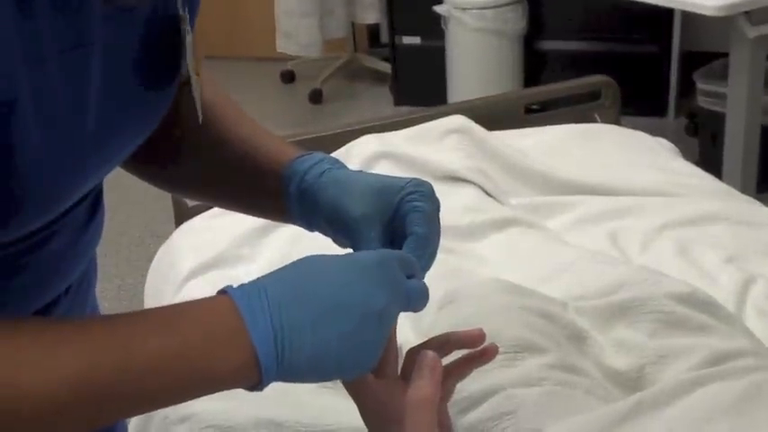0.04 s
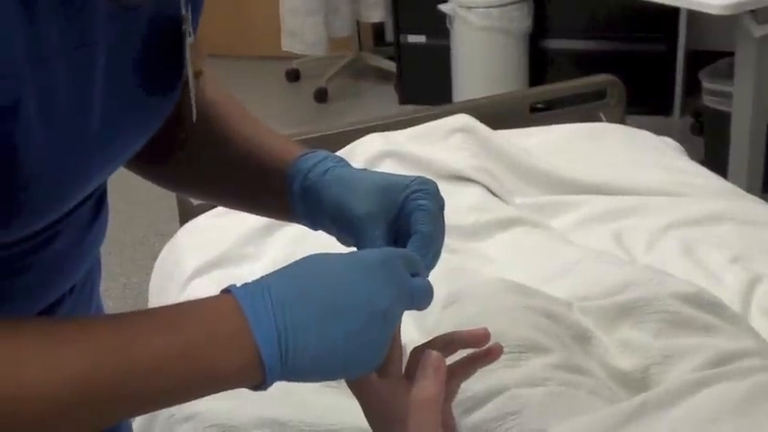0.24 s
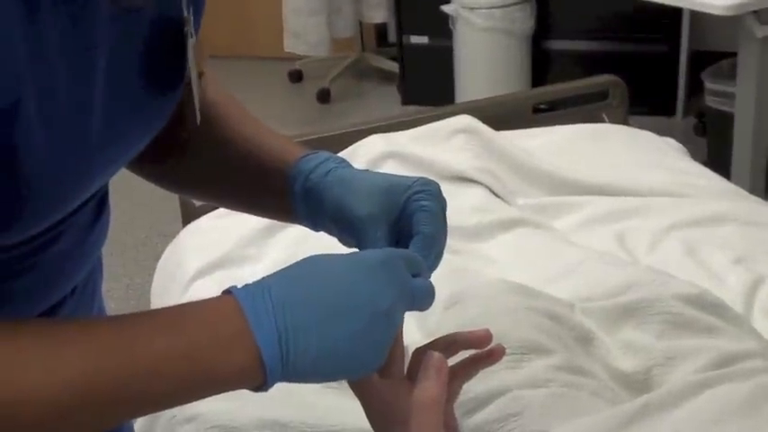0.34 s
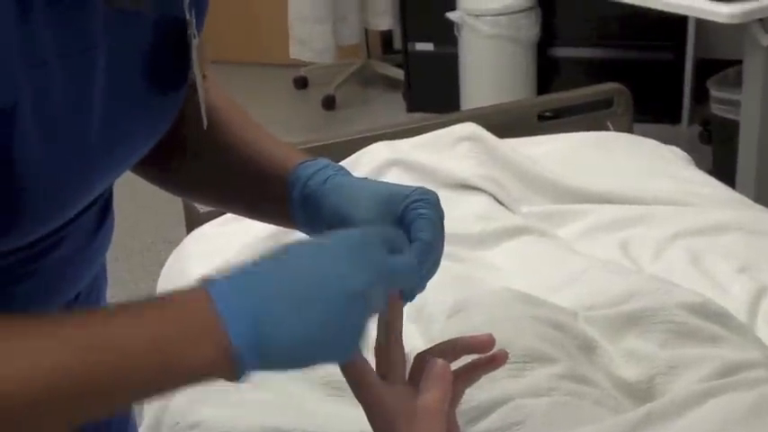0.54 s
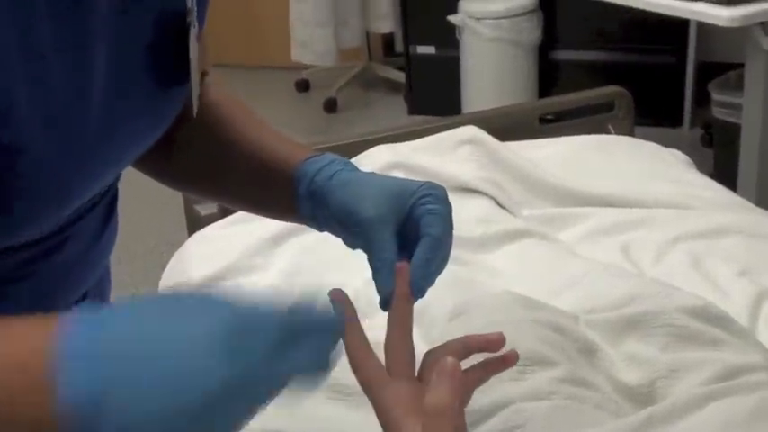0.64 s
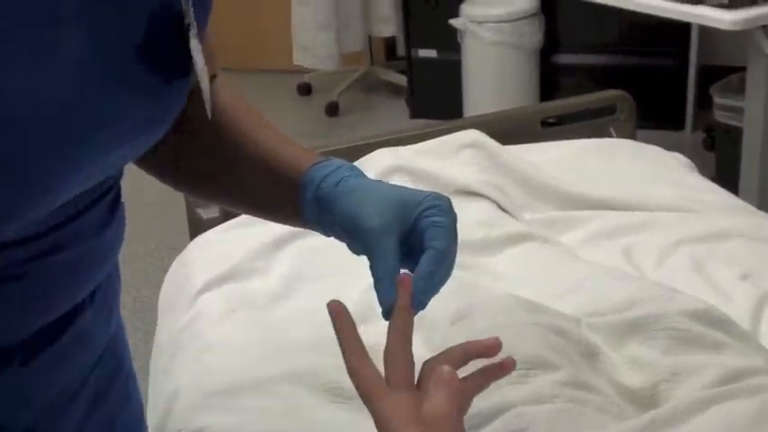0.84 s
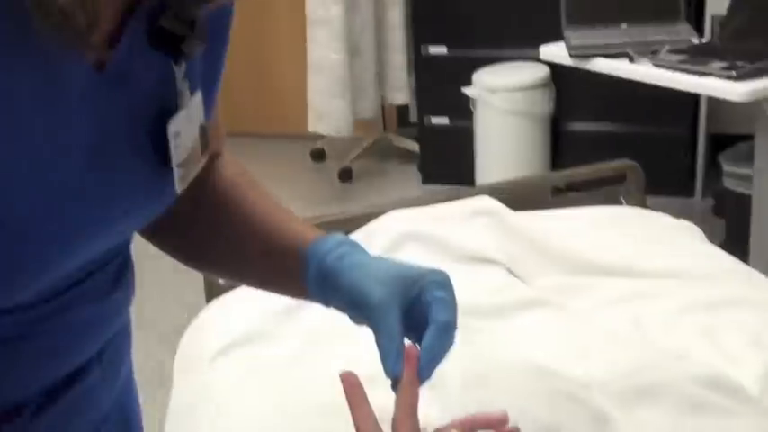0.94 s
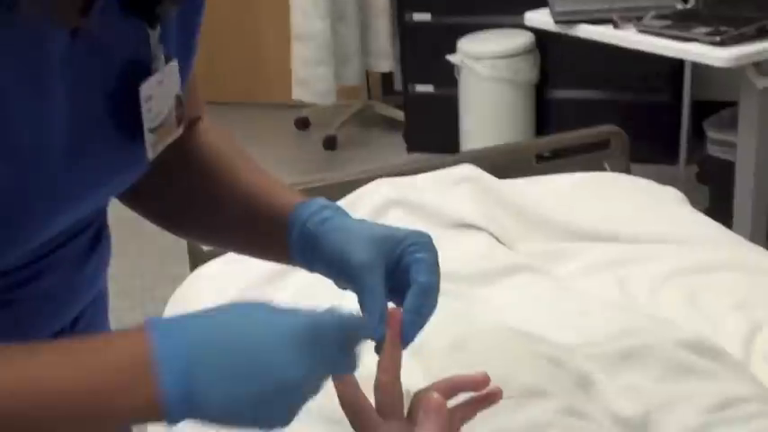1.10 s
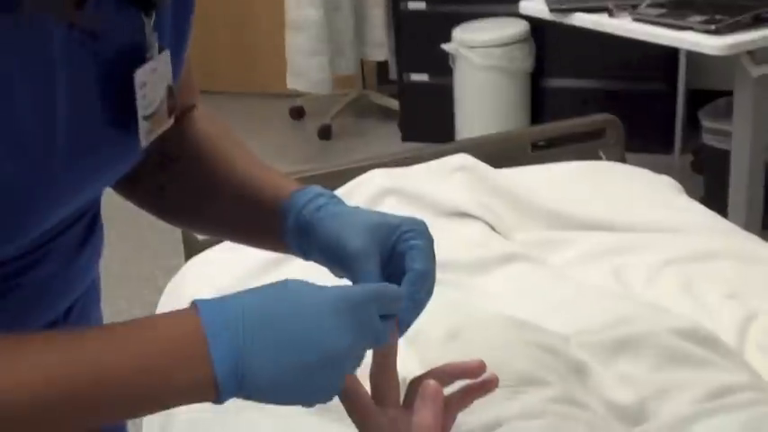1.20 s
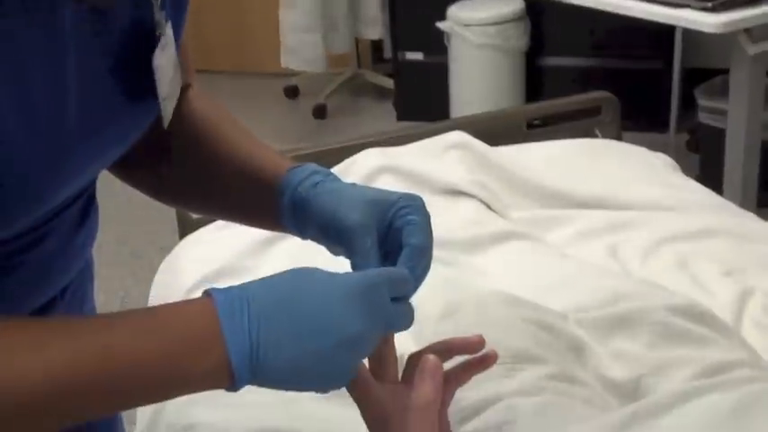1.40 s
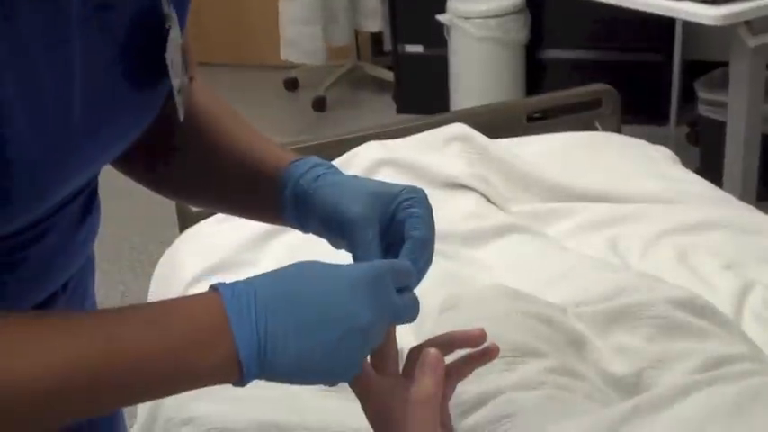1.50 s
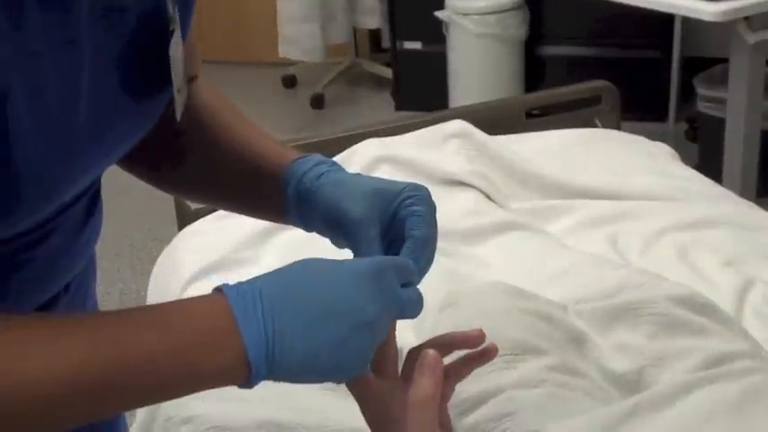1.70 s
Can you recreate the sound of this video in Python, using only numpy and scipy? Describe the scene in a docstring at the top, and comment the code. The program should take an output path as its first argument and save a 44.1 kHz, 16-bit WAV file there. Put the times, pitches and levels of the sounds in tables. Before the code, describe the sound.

Close by, a plastic finger pricker clicks and snaps with a tiny, quickly stopped spring ring. Afterwards there is only a faint rustle of gloves and the low, steady hum and hiss of air in a hospital room.

```python
"""Ventilation rumbles, hisses and hums in a quiet clinic room. Then, close by, a spring-loaded plastic
lancet (a finger pricker) is fired against a fingertip. Its trigger ticks as it is pressed and its catch
clicks free: plastic scrapes and the housing rings. The needle carrier rattles home and its ringing
spring is stopped dead. Afterwards, gloved hands rustle softly."""
import sys
import numpy as np
from scipy import signal
from scipy.fft import rfft, irfft
from scipy.io import wavfile
from scipy.ndimage import uniform_filter1d

SR = 44100
rng = np.random.default_rng(int(sys.argv[2]) if len(sys.argv) > 2 else 0)


def pcm_store(signal):
    """Save signal as 16-bit PCM."""
    levels = np.round(np.clip(np.atleast_2d(signal), -1, 1) * 32767)
    wavfile.write(sys.argv[1], SR, levels.astype(np.int16).T)


N = 77175


def gain(db):
    """Turn decibels into a multiplier."""
    return 10 ** (np.asarray(db) / 20)


def across(points, size=N):
    """Read (frequency, value) points at every frequency of a spectrum."""
    hz, value = np.array(points, float).T
    return np.interp(np.log(np.fft.rfftfreq(size, 1 / SR) + 1), np.log(hz + 1), value)


def noise(colour):
    """Noise of a given colour (its mix of low and high), with a strength near 1."""
    shape = gain(across(colour))
    shape /= np.sqrt(np.mean(shape ** 2))
    return irfft(rfft(rng.standard_normal(N)) * shape, N)


def knock(colour, size=2048):
    """One sharp tap of a given colour, with energy 1."""
    cepstrum = irfft(np.log(gain(across(colour, size))))
    cepstrum[1:size // 2] *= 2  # folding it in half packs the energy at the tap's start
    cepstrum[size // 2 + 1:] = 0
    tap = irfft(np.exp(rfft(cepstrum)))
    return tap / np.linalg.norm(tap)


def fade(age, t60):
    """Silent before age 0, then dying away by 60 dB every t60 seconds (the fade time)."""
    return (age >= 0) * np.exp(-np.log(1000) * np.maximum(age, 0) / t60)


def swell(age, rise, hold, t60):
    """Rise, hold, then die away."""
    return np.clip(age / rise, 0, 1) ** 2 * fade(np.maximum(age - rise - hold, 0), t60)


def bump(t, centre, width):
    """A smooth rise and fall."""
    return np.exp(-((t - centre) / width) ** 2)


def lows(x, hz):
    """The part of a sound below a frequency."""
    return irfft(rfft(x) / (1 + (np.fft.rfftfreq(N, 1 / SR) / hz) ** 6), N)


def drift(per_second):
    """A slow random wander, roughly between -1 and 1."""
    step = int(SR / per_second)
    return 1.25 * uniform_filter1d(np.repeat(rng.standard_normal(N // step + 1), step), step)[:N]


# colour of the moving air (frequency [Hz], relative level [dB])
AIR_COLOUR = [(15, -23), (25, -1), (49, 0.5), (75, -11.5), (113, -4), (209, -10), (240, -12.5), (267, -10),
              (433, -17), (482, -15), (552, -16.5), (722, -17), (1020, -19), (2490, -24), (5880, -29.5),
              (13900, -40), (15500, -43)]
# how alike the air sounds in both ears (frequency [Hz], likeness [0-1])
AIR_LIKENESS = [(60, 0.86), (130, 1), (290, 0.6), (640, 0.21), (1410, 0.27), (3100, 0.24), (6820, 0.25),
                (15000, 0.12)]


def air():
    """Moving air makes noise: the rumble is much the same in both ears, the hiss mostly is not."""
    shared, left, right = (rfft(noise(AIR_COLOUR)) for _ in range(3))
    likeness = np.clip(across(AIR_LIKENESS), 0, .999)
    spectrum = np.sqrt(likeness) * shared + np.sqrt(1 - likeness) * np.array([left, right])
    return gain(-48) * irfft(spectrum, N)


# tones of the fan and mains power (pitch [Hz], level [dB])
HUM_TONES = [(42, -56.5), (120, -63), (184, -66), (239, -62.5), (305, -63), (730, -71)]
# brief swells of the low drone (peak time [s], half-width [s], pitch [Hz], level [dB])
HUM_SWELLS = [(.63, 0.077, 237.6, -52.5), (0.887, 0.067, 118.7, -53.5), (1.342, 0.045, 122, -44.5),
              (1.63, 0.17, 184.8, -55)]


def hum(t):
    """The fan and mains power hum in low tones that waver and now and then swell."""
    tones = sum(gain(db + 3.5 * drift(5.64)) * np.sin(2 * np.pi * hz * t + drift(4.9))
                for hz, db in HUM_TONES)
    swells = sum(gain(db) * bump(t, centre, width) * np.sin(2 * np.pi * hz * t + drift(12))
                 for centre, width, hz, db in HUM_SWELLS)
    return tones + swells


# which side the ventilation leans to (frequency [Hz], left minus right [dB])
VENT_BALANCE = [(60, -22), (110, -16.5), (200, -19), (380, -5), (700, -0.5), (1290, 2.5), (2380, 0),
                (4400, -3), (8120, -0.5), (15000, -10.5)]
# slow changes in the hiss (time [s], level change [dB])
HISS_CHANGES = [(0, -1.5), (.45, -1.5), (.75, -0.7), (1.25, -0.5), (1.42, -0.9), (1.75, 0.9)]


def ventilation(t):
    """Air and hum together, with the rumble stronger on the right."""
    sides = gain(np.array([[.5], [-.5]]) * across(VENT_BALANCE))
    sound = irfft(rfft(air() + hum(t)) * sides / sides.mean(axis=0), N)
    rumble = lows(sound, hz=1490)
    hiss_db = np.interp(t, *np.array(HISS_CHANGES).T)
    return rumble + gain(hiss_db) * (sound - rumble)


# tones of the plastic housing (pitch [Hz], level [dB], fade time [s])
HOUSING_TONES = [(550, -17.5, 0.016), (1112, -18, 0.043), (1594, -17.5, 0.025), (2020, -13, 0.036),
                 (2560, -3, 0.013), (3440, -3, .012), (3880, -10, 0.017), (4790, -15.5, 0.021),
                 (5730, -12, 0.016), (7700, -30, .009)]


def housing_ring(age, rise):
    """The housing rings in short tones; every other one starts upside down."""
    return sum((-1) ** k * gain(db) * np.sin(2 * np.pi * hz * (age - rise)) * swell(age, rise, 0, t60)
               for k, (hz, db, t60) in enumerate(HOUSING_TONES))


# colour of plastic scraping on plastic (frequency [Hz], relative level [dB])
SCRAPE_COLOUR = [(150, -2.5), (500, -15.5), (850, -15.5), (1500, -12.5), (2600, -0.5), (4000, -5.5),
                 (5500, -8), (7000, -16.5), (9300, -16.5), (10800, -35), (13000, -24), (16000, -41)]
# clicks of the trigger and catch
# (time [s], level [dB], rise [s], scrape fade time [s], ring [dB], bass [dB], treble [dB], echo [dB])
CLICKS = [(0.1479, -24, .006, 0.017, -6, -1, 0, -10.5), (0.1687, -8.5, 0.00113, 0.021, 0, -9, -10.5, -14),
          (0.2111, -5.5, 0.00125, 0.0095, 1.5, 3, 0, -15.5)]


def trigger_and_catch(t):
    """Each click is a brief scrape that ends in a ring of the housing."""
    sound = 0
    for start, db, rise, t60, ring_db, bass_db, treble_db, echo_db in CLICKS:
        age = t - start
        scrape = gain(-9) * noise(SCRAPE_COLOUR) * swell(age, rise, 0, t60)
        click = scrape + gain(ring_db - 9.5) * housing_ring(age, rise)
        bass = lows(click, hz=1300)
        middle = lows(click, hz=3050) - bass
        treble = click - bass - middle
        click = gain(db) * (gain(bass_db) * bass + middle + gain(treble_db) * treble)
        sound += click + gain(echo_db) * room_echo(click, t)
    return sound


def room_echo(sound, t):
    """Sound bounces off hands, bed and walls in a short blur of echoes."""
    tail = lows(rng.standard_normal(N), hz=7000) * swell(t, rise=.0082, hold=0, t60=.08)
    return signal.fftconvolve(sound, tail / np.linalg.norm(tail))[:N]


# tones of the spring (pitch [Hz], level [dB])
SPRING_TONES = [(2092, -4), (2206, -5), (2515, 3.5), (2708, -3), (2904, 4), (3111, -4), (3306, -0.5),
                (3418, -2.5), (3866, 1), (4484, -1.5), (4729, -6.5), (5117, -1), (5603, -4.5), (5931, -5)]
# low tones of the barrel, pressed on the finger (pitch [Hz], level [dB])
BARREL_TONES = [(160, -5.5), (325, 0), (489, 3.5), (706, 3.5), (899, -2.5), (1103, 3.5), (1290, 2),
                (1480, 3), (1673, 5), (1990, 1.5)]


def spring_and_barrel(age):
    """The freed spring rings high and the barrel rings low, each with many tones at once."""
    def ring(tones):
        return sum(gain(db) * np.sin(2 * np.pi * (hz * age + rng.random())) for hz, db in tones)
    return gain(-21) * ring(SPRING_TONES) + gain(-29) * ring(BARREL_TONES)


# knocks of the carrier as it rattles home (time [s], relative level [dB])
CARRIER_KNOCKS = [(0.2276, -22), (0.2304, -3), (0.2333, -2.5), (0.2356, -4), (0.2396, 4.5), (0.241, -8.5),
                  (0.246, -14)]
# colour of its knocks and grinding (frequency [Hz], relative level [dB])
CARRIER_COLOUR = [(60, -7.5), (160, -16), (280, -24.5), (600, -6), (1300, -5.5), (2000, -5.5), (2800, -0.5),
                  (3900, 0.5), (5200, -7.5), (6800, -11.5), (8800, -12), (10300, -27), (13300, -31),
                  (16000, -44)]


def carrier(t, motion):
    """The carrier grinds along its guide and knocks against it, each knock a tiny burst of noise."""
    bursts = sum(gain(db) * fade(t - start, t60=.008) for start, db in CARRIER_KNOCKS)
    contact = bursts * rng.standard_normal(N)
    contact *= np.sqrt(len(CARRIER_KNOCKS)) / np.linalg.norm(contact)  # average energy 1 per knock
    knocks = signal.fftconvolve(contact, knock(CARRIER_COLOUR))[:N]
    grinding = motion * noise(CARRIER_COLOUR)
    return gain(2.5) * knocks + gain(-17.5) * grinding


def snap(t, start=.2268):
    """The carrier shoots forward while spring and barrel ring, until the fingertip stops them."""
    age = t - start
    motion = swell(age, rise=.00572, hold=.01054, t60=.0074)
    sound = motion * spring_and_barrel(age) + carrier(t, motion)
    return sound + gain(-62) * room_echo(sound, t)


# colour of rubbing gloves (frequency [Hz], relative level [dB])
GLOVE_COLOUR = [(300, -20), (1200, -5), (2500, 6), (3600, -8), (4500, 4), (5300, -13), (6200, -3),
                (7500, -10), (15000, -21)]
# soft rustles (peak time [s], half-width [s], level [dB], treble [dB])
GLOVE_RUSTLES = [(0.766, 0.076, -67, 13), (1.028, 0.091, -64, -3), (1.63, 0.2, -62.5, -14)]


def gloves(t):
    """Gloved hands shift softly; a lighter touch is brighter."""
    rub = noise(GLOVE_COLOUR)
    dull = lows(rub, hz=7000)
    return sum(gain(db) * bump(t, centre, width) * (dull + gain(treble_db) * (rub - dull))
               for centre, width, db, treble_db in GLOVE_RUSTLES)


def scene():
    """The lancet and gloves in the centre, with the ventilation all around."""
    t = np.arange(N) / SR
    return trigger_and_catch(t) + snap(t) + gloves(t) + ventilation(t)


def record(dry):
    """Round off the loudest peaks and cut the very highest treble."""
    ceiling, top_hz = .62, 15600
    rounded = ceiling * np.tanh(dry / ceiling)
    return signal.sosfilt(signal.ellip(10, .2, 80, top_hz, fs=SR, output="sos"), rounded)


dry = scene()
out = record(dry)
pcm_store(out)
```